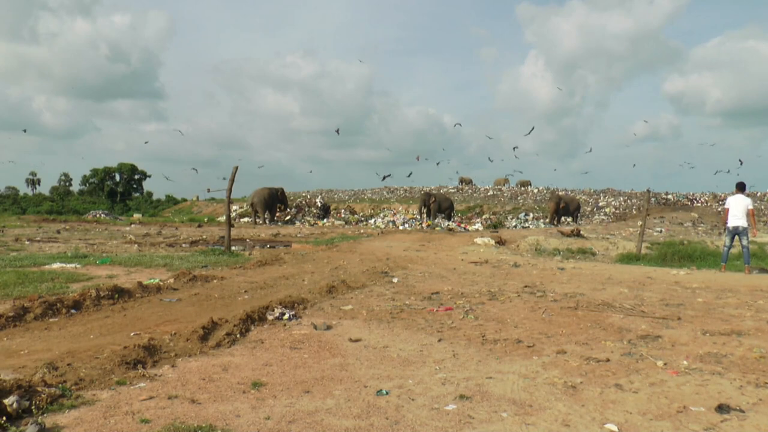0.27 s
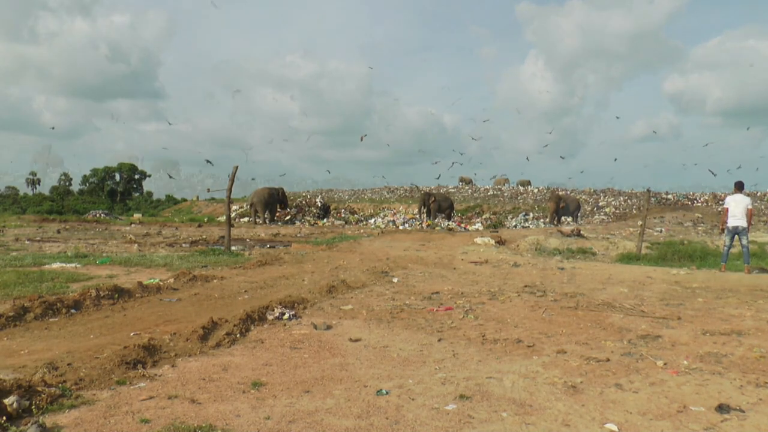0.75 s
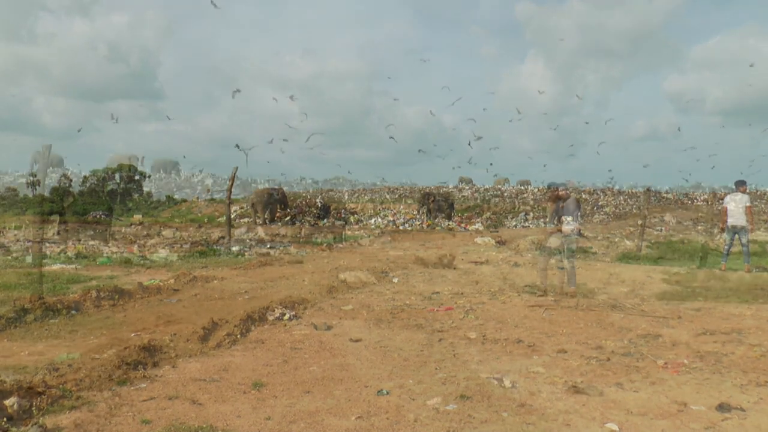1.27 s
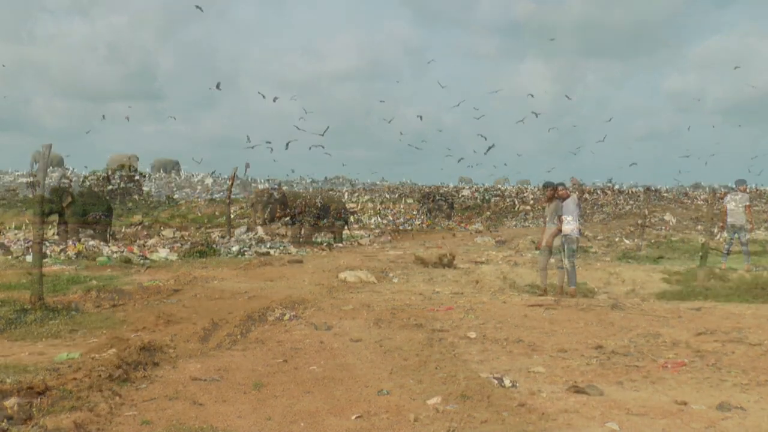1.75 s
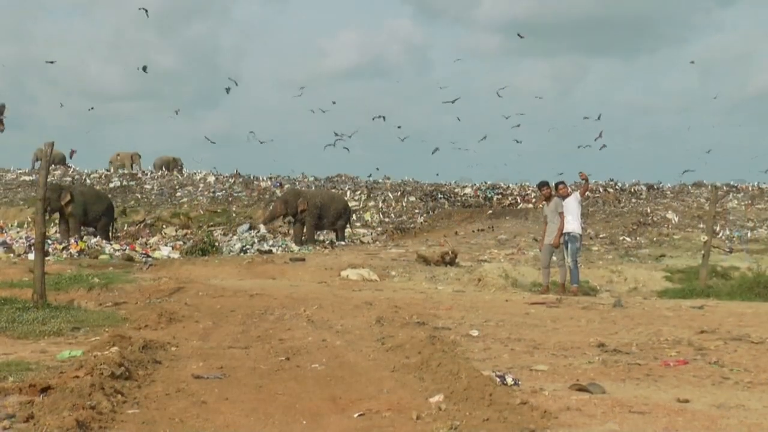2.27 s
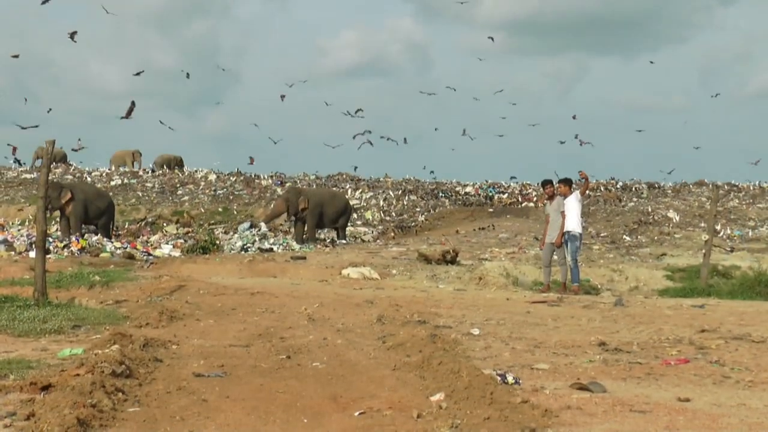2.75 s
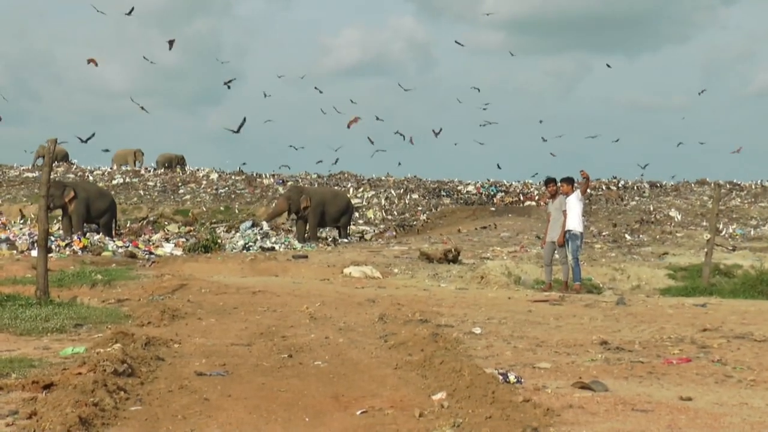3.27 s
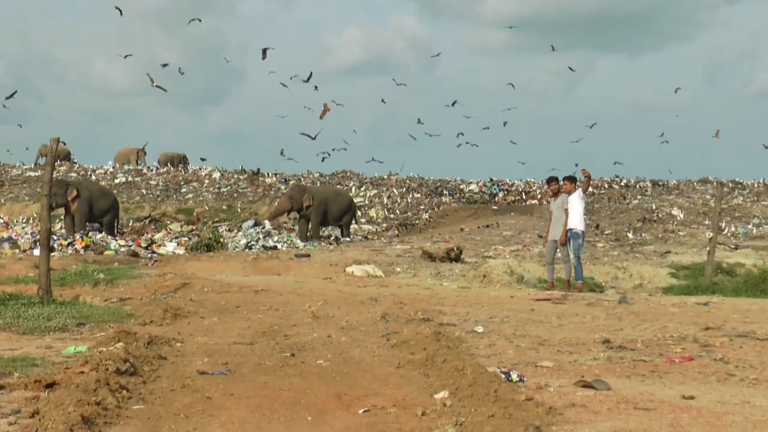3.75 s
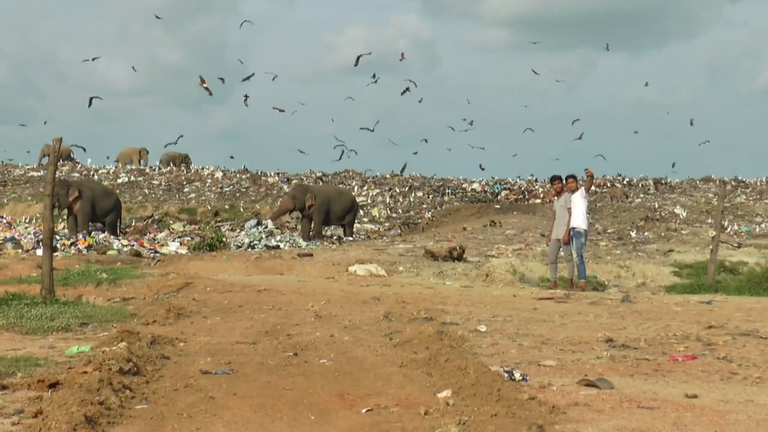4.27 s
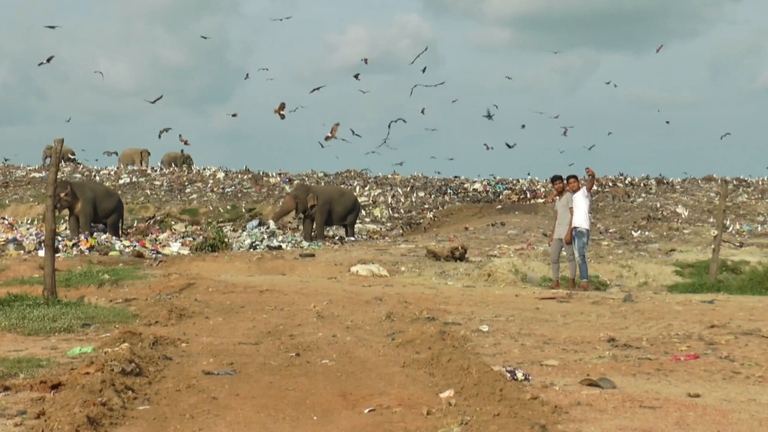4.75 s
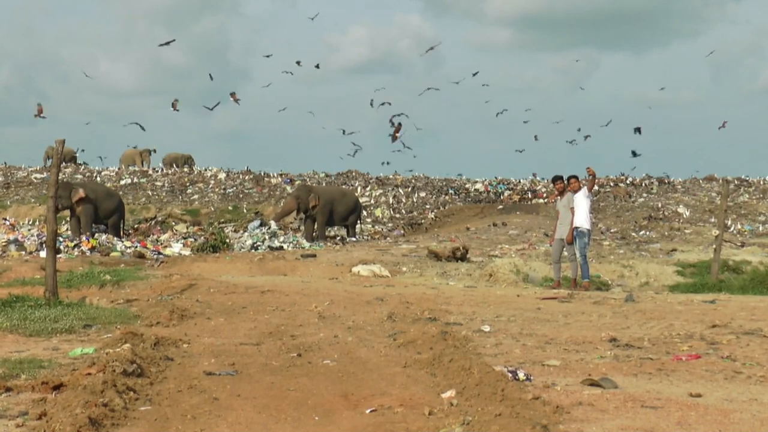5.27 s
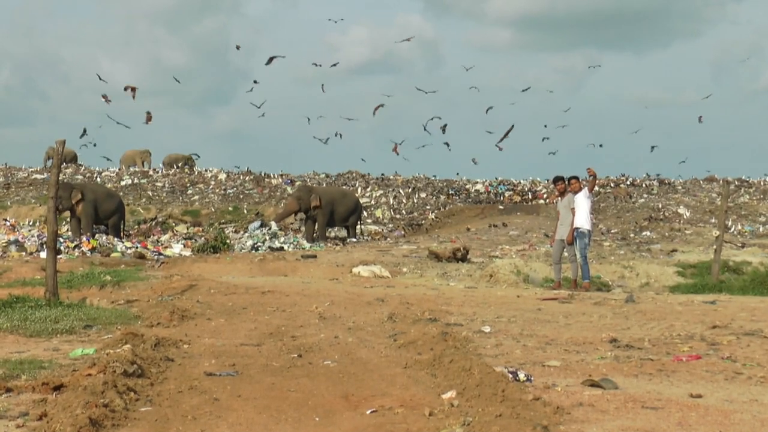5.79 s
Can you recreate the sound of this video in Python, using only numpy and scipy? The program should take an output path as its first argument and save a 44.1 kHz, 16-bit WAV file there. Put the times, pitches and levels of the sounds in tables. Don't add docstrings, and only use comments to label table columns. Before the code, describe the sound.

Hoarse near crows call above a continuous din of distant cawing outdoors, with tiny bird chirps, a repeated piping note and soft wind rumble.

```python
import sys
import numpy as np
from scipy import signal
from scipy.fft import rfft, irfft, next_fast_len
from scipy.io import wavfile
from scipy.ndimage import uniform_filter1d, map_coordinates

SR = 44100
rng = np.random.default_rng(int(sys.argv[2]) if len(sys.argv) > 2 else 0)


def file_out(sig):
    cols = np.atleast_2d(sig).T
    lim = np.clip(cols, -1, 1)
    pcm = np.round(lim * 32767).astype(np.int16)
    wavfile.write(sys.argv[1], SR, pcm)


def gain_from_decibels(decibels):
    exponent = np.asarray(decibels, float) / 20
    return 10 ** exponent


N = 265482
HOOK_S, HOOK = .075, .13


def unit(x):
    return x / np.sqrt(np.mean(x ** 2) + 1e-20)


def along(points, hz):
    f, v = np.transpose(points)
    return np.interp(np.log(hz + 1), np.log(f + 1), v)


def at_times(points, t):
    s, v = np.transpose(points)
    return np.interp(t, s, v)


def wobble(n, rate):
    knots = rng.standard_normal(int(n * rate / SR) + 4)
    return map_coordinates(knots, [np.arange(n) * rate / SR], order=1)


def filtered(x, response):
    m = next_fast_len(N + 8192)
    return irfft(rfft(x, m) * response(np.fft.rfftfreq(m, 1 / SR)), m)[..., :N]


def turns(hz):
    return 2 * np.pi * np.cumsum(hz) / SR


def fade(n, rise_s, fall_s):
    t = np.arange(n) / SR
    return np.sin(np.pi / 2 * np.clip(np.minimum(t / rise_s, t[::-1] / fall_s), 0, 1)) ** 2


def add(out, s, x, pan_db):
    at = round(s * SR)
    part = out[:, max(at, 0):max(at + x.shape[-1], 0)]
    sides = gain_from_decibels([[pan_db / 2], [-pan_db / 2]])
    part += sides * x[..., max(-at, 0):][..., :part.shape[1]]


def contour(length, top_hz, end_hz, power):
    t = np.arange(round(length * SR)) / SR
    scoop = HOOK * np.clip(1 - t / HOOK_S, 0, 1) ** 3
    after = np.clip((t - HOOK_S) / (length - HOOK_S), 0, 1)
    return t, top_hz * (1 - scoop) - (top_hz - end_hz) * after ** power


def syrinx(pitch, rasp_hz, depth, shake):
    n = len(pitch)
    rasp_rate = rasp_hz * pitch / pitch.max() * (1 + .02 * wobble(n, 40))
    rasp = turns(rasp_rate) + rng.uniform(0, 2 * np.pi)
    phase = turns(pitch * (1 + .0045 * wobble(n, 120))) + shake * np.sin(rasp)
    swell = (1 + np.clip(depth, 0, 1) * np.cos(rasp)) * gain_from_decibels(2.2 * wobble(n, 45))
    return phase, swell


def field(x, t60):
    t = np.arange(SR // 3) / SR
    tail = rng.standard_normal((2, len(t))) * gain_from_decibels(-60 * t / t60) * (t > .004)
    return signal.fftconvolve(x, tail / np.linalg.norm(tail[0]), axes=1)[:, :N]


# [t/s, length/s, top f/Hz, end f/Hz, level/dB]
NEAR_CAWS = [
    [(1.712, 0.35, 632, 511.7, -44), (1.79, 0.25, 645.5, 577, -51.5), (5.0, 0.34, 591, 490, -43)],
    [(4.728, 0.32, 664.6, 571, -47), (5.2, 0.23, 631, 560, -53.5)],
    [(-.04, 0.34, 689, 579, -59.5), (.08, 0.19, 630, 564, -58), (.59, 0.18, 724, 694, -67)],
    [(-.2, 0.33, 618, 488, -49.5), (.938, 0.46, 619.2, 472, -46.5)],
    [(.745, 0.22, 648, 628, -56.5), (2.1, 0.15, 596, 560, -51.5), (2.16, .26, 596, 475, -52),
     (2.395, 0.3, 651, 575, -61), (4.0, 0.27, 643, 493, -58), (5.7, 0.38, 634, 522, -60)],
    [(0.984, 0.52, 688, 508, -63.5)],
    [(2.881, 0.3, 679.4, 584, -62)],
    [(4.565, 0.3, 688, 535, -67)],
    [(4.12, 0.4, 657.6, 515.5, -58.5)],
    [(3.576, 0.37, 690, 560, -54.5), (3.6, .3, 622, 555, -58)],
]
# [rasp f/Hz, rasp depth 0-1, pitch shake/rad, level drift/dB per s, droop power]
BIRD_MANNER = [(99.1, 0.28, -0.055, -31, 1.35), (93.8, 0.6, 0.17, -9, 0.84), (98, 0.5, -0.57, 12, 1.3),
               (103, 0.4, -0.2, -6.5, 1.15), (97.2, 0.55, 0.05, 1, 1.2), (97.2, 0.4, -0.42, -39, 1.5),
               (98.2, 0.14, -0.47, -11, 1.4), (91.4, 0.6, -0.0034, -17, 0.97), (94.8, 0.2, 0.22, -10, 1.15),
               (98.2, 0.65, -0.35, 14, 1.4)]
# [1st harmonic re 3rd/dB, 2nd re 3rd/dB, overtones/dB, left-right/dB]
BIRD_COLOUR = [(-21, -9.5, -11.5, -4.5), (-19.5, -13.5, -4, -5.5), (-26, -7, -4.5, -3.5),
               (-22.5, -17.5, -8.5, -4), (-29, -15, -19, 0.5), (-9, 12, 2, -2), (-8.5, 0.5, 10.5, -5.5),
               (-14, 12.5, 8, -1), (-18, -12, -6, -8.5), (-21, -8.5, -4, -5.5)]
BIRD_BREATH = [-35, -33, -29, -27, -34.5, -17, -24, -21, -29, -27]
# [f/Hz, level/dB]
BEAK = [(2000, -6.5), (2600, -11), (3300, -28), (4100, -55), (5000, -13), (6500, 5), (8000, -22)]
# [f/Hz, level/dB]
THROAT_TUBE = [(1000, 0), (1300, 0), (1520, -5), (1820, 1), (2050, 0), (2400, -2), (3000, 0)]
# [f/Hz, level/dB]
BEAK_HISS = [(1000, -33), (2500, 3), (4000, 2), (5000, -3.5), (6500, -0.5), (8000, -8), (10500, -12),
             (14000, -25)]


def near_crows():
    out, breath = np.zeros((2, 2, N))
    for calls, manner, colour, hiss_db in zip(NEAR_CAWS, BIRD_MANNER, BIRD_COLOUR, BIRD_BREATH):
        *rasp, drift_db, power = manner
        first_db, second_db, over_db, pan_db = colour
        for s, length, top_hz, end_hz, db in calls:
            t, pitch = contour(length, top_hz, end_hz, power)
            n = len(t)
            phase, swell = syrinx(pitch, *rasp)
            level = [first_db, second_db, 0]
            level += [over_db + along(BEAK, k * pitch) for k in range(4, 7)]
            voice = sum(gain_from_decibels(v) * np.sin(k * phase + k * k) * swell ** min(k / 3, 1)
                        for k, v in enumerate(level, 1))
            push = gain_from_decibels(db + 3.5 + drift_db * (t - HOOK_S)) * fade(n, .052, .025)
            add(out, s, voice * push, pan_db)
            air = gain_from_decibels(hiss_db + 11) * push * swell * fade(n, .08, .05)
            add(breath, s, air * rng.standard_normal((2, n)), pan_db)
    voices = filtered(out, lambda hz: gain_from_decibels(along(THROAT_TUBE, hz)))
    return voices + filtered(breath, lambda hz: gain_from_decibels(along(BEAK_HISS, hz)))


# [t/s, length/s,
# start f/Hz, end f/Hz, level/dB]
BARK_CALLS = [(0.192, 0.08, 1290, 1660, -52.5), (0.439, 0.1, 1320, 1190, -56),
              (0.694, 0.091, 1285, 1815, -53), (0.834, 0.09, 1290, 1800, -55),
              (1.402, 0.03, 1400, 1760, -57), (1.39, 0.07, 1260, 1760, -55), (1.613, 0.087, 880, 379, -74),
              (4.516, 0.06, 1215, 1340, -53), (3.147, .045, 1796, 1370, -59), (3.51, 0.074, 940, 655, -68),
              (3.07, .11, 1600, 1540, -61), (.63, .1, 1130, 1090, -61), (3.505, 0.08, 1960, 1300, -57)]


def barks():
    out = np.zeros((2, N))
    for s, length, hz, end_hz, db in BARK_CALLS:
        u = np.linspace(0, 1, round(length * SR))
        bend = 5 if end_hz > hz else 2
        phase, swell = syrinx(hz + (end_hz - hz) * u ** bend, 99, depth=.55, shake=.39)
        push = gain_from_decibels(db + 2 + 2.5 * u ** 5) * fade(len(u), .019, .0049)
        add(out, s, push * swell * np.sin(phase), 0)
    return out


# [t/s, length/s, top f/Hz, end f/Hz, level/dB]
WHINE_CALLS = [
    (3.625, .28, 1345, 1185, -57.5),
    (2.89, .27, 2160, 1830, -63),
    (1.89, .12, 1400, 1100, -60),
]


def whines():
    rise, top_at = .1185, .325
    out = np.zeros((2, N))
    for s, length, top_hz, end_hz, db in WHINE_CALLS:
        u = np.linspace(0, 1, round(length * SR))
        corners = np.interp(u, [0, top_at, 1], [top_hz * (1 - rise), top_hz, end_hz])
        pitch = uniform_filter1d(corners, size=len(u) // 6, mode="nearest")
        phase, swell = syrinx(pitch, 94.5, depth=.33, shake=-.21)
        add(out, s, gain_from_decibels(db + 5.5) * swell * np.sin(phase) * fade(len(u), .02, .035), -3)
    return out


# [t/s, length/s, top pulse f/Hz, level/dB, brightness above the 3rd resonance/dB]
CROAK_CALLS = [
    (0.477, 0.12, 105, -55.5, -3.5),
    (0.945, .31, 96.7, -49.5, -6.5),
    (1.871, 0.23, 101.8, -50.5, -10),
    (2.887, 0.39, 103, -63.5, 6),
    (3.292, .24, 100.7, -49.5, 3.5),
    (5.001, 0.4, 99.9, -52.5, 2),
]
# [multiple of pulse rate, width in multiples, level/dB]
GULLET_LINES = [(11.8, .8, -5), (16.3, .75, 3.5), (20.3, .75, -2), (23.6, 1.1, -14), (41.5, 2, -26)]


def croaks():
    sag_per_s, fade_db_per_s = .45, -2
    drop, drop_s, drop_db = .12, .015, 3
    pan_db, air_db = -6, -12
    out, breath = np.zeros((2, 2, N))
    order = np.arange(7, 50)
    lag = np.arctan2(1, np.subtract.outer(order, [c for c, w, db in GULLET_LINES])).sum(1)
    lag = lag + .12 * order ** 2
    for s, length, top_hz, top_db, bright_db in CROAK_CALLS:
        t, rate = contour(length, top_hz, top_hz * (1 - sag_per_s * (length - HOOK_S)), power=1.3)
        n = len(t)
        spent = np.exp((t - length) / (2 * drop_s))
        rate = rate * (1 - drop * np.clip((bright_db + 8) / 8, .15, 1) * spent ** 2)
        phase = turns(rate * (1 + .008 * wobble(n, 90)))
        gain = sum(gain_from_decibels(db + bright_db * (k > 2)) / (1 + ((order - c) / w) ** 2) ** 1.4
                   for k, (c, w, db) in enumerate(GULLET_LINES))
        voice = gain @ np.sin(np.outer(order, phase) + lag[:, None])
        push = gain_from_decibels(top_db + fade_db_per_s * t - drop_db * spent + 1.8 * wobble(n, 94))
        push = push * fade(n, .025, .01)
        add(out, s, push * voice, pan_db)
        air = gain_from_decibels(bright_db + air_db) * push * (1 + .4 * np.cos(phase))
        add(breath, s, air * rng.standard_normal((2, n)), pan_db)
    return out + filtered(breath, lambda hz: gain_from_decibels(along(BEAK_HISS, hz)))


# [t/s, level/dB]
FLOCK_LEVEL = [(0, -54.5), (.35, -57), (.79, -58), (1.1, -52), (1.52, -56.5), (1.85, -53), (2.4, -54.5),
               (2.72, -59), (2.95, -56.5), (3.2, -54), (3.45, -57.5), (3.95, -54.5), (4.45, -54),
               (4.61, -59), (5, -51), (5.44, -52.5), (5.55, -58.5), (6.02, -53)]
# [f/Hz, level/dB]
FLOCK_THROAT = [(240, -11), (400, -23), (555, -16.5), (678, -19), (912, -12), (1090, -11), (1190, -5.5),
                (1440, 2), (1770, 0.5), (2150, -5), (2620, -20), (3450, -15), (5000, -18), (6500, -63),
                (11000, -120)]


def flock(count=150):
    echo_db, echo_t60_s = -8, .35
    out = np.zeros((2, N))
    for k, (when, long, high, hoarse, loud, side) in enumerate(rng.random((count, 6))):
        u = np.linspace(0, 1, round((.15 + .25 * long) * SR))
        pitch = (500 + 200 * high) * (1 - .1207 * np.exp(-u / .05967) - .2 * u ** 1.6)
        phase, swell = syrinx(pitch, 85 + 30 * side, .84 + .73 * hoarse, .39 * (side - .5))
        voice = sum(np.sin(h * phase + h * h) for h in range(1, 7)) * swell
        s = (k + when) / count * (N / SR + .2) - .2
        add(out, s, gain_from_decibels(7.5 * loud) * voice * fade(len(u), .028, .018), 5 * (side - .5))
    out = filtered(out, lambda hz: gain_from_decibels(along(FLOCK_THROAT, hz)))
    out += gain_from_decibels(echo_db) * field(out, echo_t60_s)
    power = uniform_filter1d(np.mean(out ** 2, 0), size=SR // 5)
    crowd = np.sqrt(np.abs(power) + 1e-12)
    return out / crowd * gain_from_decibels(at_times(FLOCK_LEVEL, np.arange(N) / SR))


# [t/s, length/s, foot f/Hz, turning f/Hz,
# level/dB]
ARCHED = [(0.337, 0.13, 2640, 4600, -73.5), (0.868, .035, 3350, 3800, -74), (3.8, .055, 2850, 3650, -71),
          (3.362, .025, 3450, 2800, -69), (2.045, .05, 3050, 3350, -72), (1.449, 0.018, 2300, 3050, -65),
          (1.826, .042, 2760, 4030, -69.5), (2.454, 0.076, 2680, 4570, -65),
          (3.077, 0.022, 5300, 5150, -71), (3.988, 0.036, 3400, 4650, -68),
          (4.025, 0.025, 2920, 4200, -60.5), (4.048, .013, 2720, 3500, -62), (4.061, .011, 3100, 4000, -69),
          (4.519, 0.071, 2960, 4320, -65.5), (5.783, 0.078, 3010, 3970, -76.5)]
# [t/s, length/s, start f/Hz, end f/Hz, level/dB]
SLIDING = [(0.079, 0.072, 3670, 3560, -75.5), (.375, .015, 3800, 4930, -71),
           (0.647, 0.032, 3560, 2750, -71), (0.9, 0.045, 3700, 4300, -75), (.834, .035, 3550, 4400, -75),
           (1.252, 0.02, 3870, 2560, -70), (1.287, 0.04, 2570, 2290, -70), (1.396, .013, 3720, 3250, -65),
           (1.405, .022, 4030, 3250, -73), (1.387, .02, 2880, 2300, -71), (1.76, 0.036, 5400, 3450, -70.5),
           (1.905, 0.115, 3180, 3700, -71.5), (1.79, .02, 3250, 3100, -70), (1.802, .01, 3500, 3900, -71),
           (2.4, 0.039, 3630, 4700, -79), (3.103, 0.02, 5440, 4080, -65.5), (3.191, .03, 4280, 3430, -73),
           (3.726, .031, 3700, 2380, -67.5), (3.57, .045, 3750, 3050, -73), (4.012, .008, 3800, 4600, -70),
           (4.068, 0.27, 7030, 7500, -75), (4.18, 0.14, 3730, 3570, -75.5), (4.3, 0.37, 3200, 3030, -78),
           (4.455, 0.047, 3690, 3830, -69), (4.591, 0.011, 5500, 5300, -63),
           (5.03, 0.087, 3160, 3050, -68.5),
           (0.958, .018, 2640, 4300, -67), (0.972, 0.054, 4200, 3720, -66.5),
              (1.22, .07, 7900, 6650, -79), (2.888, 0.027, 2330, 2550, -65),
              (1.417, 0.026, 2300, 2800, -71), (1.75, .022, 3090, 4000, -73), (1.896, .07, 3500, 3880, -81),
              (2.02, 0.06, 3650, 3900, -77), (5.5, .025, 3150, 3550, -73), (5.0, .04, 3650, 3200, -71),
              (2.602, .06, 3190, 2600, -87), (3.217, 0.035, 3200, 3620, -74),
              (3.976, .017, 4400, 5200, -69), (3.968, .018, 3550, 4250, -74),
              (3.65, 0.034, 2990, 3800, -71), (3.868, .04, 3050, 3520, -73)]


def whistles():
    out = np.zeros((2, N))
    bends = [(s, d, [a, b, a], db) for s, d, a, b, db in ARCHED]
    bends += [(s, d, [a, a + .4 * (b - a), b], db) for s, d, a, b, db in SLIDING]
    for s, length, hz, db in bends:
        u = np.linspace(0, 1, round(length * SR))
        n = len(u)
        pitch = uniform_filter1d(np.interp(u, [0, .38, 1], hz), size=n // 2, mode="nearest")
        pitch = pitch * (1 + .008 * wobble(n, 160))
        push = gain_from_decibels(db + 8 + 2.2 * wobble(n, 90)) * fade(n, .002, .008)
        add(out, s, push * np.sin(turns(pitch)), -1.5)
    return out


# t/s, length/s, centre f/Hz, swing f/Hz, level/dB
TRILL = (1.286, .108, 3680, 480, -65.5)


def trill():
    swing_s, growth_db = .0305, 3
    out = np.zeros((2, N))
    s, length, hz, swing_hz, db = TRILL
    t = np.arange(round(length * SR)) / SR
    n = len(t)
    swing = np.cos(2 * np.pi * t / swing_s - .3 + .1 * wobble(n, 40))
    level = db + 10 + growth_db * t / length + 5 * (swing - 1) + 1.2 * wobble(n, 60)
    add(out, s, gain_from_decibels(level) * np.sin(turns(hz - swing_hz * swing)) * fade(n, .003, .006), -1.5)
    return out


# [t/s, f/Hz, level/dB]
PIPE_NOTES = [
    (4.087, 2870, -61.5),
    (4.273, 2830, -60.5),
    (4.443, 2855, -60),
    (4.61, 2830, -59.5),
    (4.8, 2800, -58),
    (4.985, 2764, -54.5),
    (5.2, 2646, -56),
    (5.413, 2690, -63),
    (5.61, 2670, -68),
]


def pipes():
    out = np.zeros((2, N))
    u = np.linspace(0, 1, round(.077 * SR))
    n = len(u)
    for s, hz, db in PIPE_NOTES:
        push = gain_from_decibels(db + 1.5 + 1.5 * wobble(n, 80)) * fade(n, .0075, .0045)
        add(out, s, push * np.sin(turns(hz * (1 - .07 * u ** 14))), -2.5)
    return out


# [t/s, length/s, f/Hz, width f/Hz, level/dB]
RATTLE_CALLS = [(.29, 0.079, 3360, 400, -74), (.43, .048, 3700, 370, -73), (0.864, .16, 7150, 400, -77.5),
                (1.023, .15, 5970, 1000, -68.5), (1.041, .14, 4280, 450, -71),
                (1.198, .042, 3560, 350, -64), (1.32, 0.12, 7450, 1500, -72), (3.315, .23, 4070, 420, -68),
                (4.45, .14, 7000, 2698, -74.5), (5.595, 0.02, 3300, 500, -66),
                (5.595, .012, 2600, 500, -66), (1.72, .06, 3380, 250, -72), (5.01, .2, 4120, 300, -74),
                (3.32, .2, 6700, 1300, -74), (3.25, .08, 3150, 200, -73), (5.37, .05, 3320, 150, -72),
                (5.675, .026, 8600, 630, -74)]


def rattles():
    out = np.zeros((2, N))
    for s, length, hz, width_hz, db in RATTLE_CALLS:
        n = round(length * SR)
        buzz = np.array([wobble(n, width_hz), wobble(n, width_hz)])
        tone = np.sin(turns(np.full(n, hz)))
        add(out, s, gain_from_decibels(db + 7.5) * buzz * tone * fade(n, .0057, .0056), -2)
    return out


# [t/s, peak level/dB, thud level/dB]
KNOCKS = [
    (5.3759, -51, -6),
    (5.4516, -55.5, -8),
    (5.598, -60, -22),
    (5.6064, -76, -15),
    (5.664, -80, 17),
]


def ticks():
    out, t = np.zeros((2, N)), np.arange(SR // 25) / SR
    for s, db, thud_db in KNOCKS:
        crack = rng.standard_normal((2, len(t))) * gain_from_decibels(-60 * t / .014)
        thud = gain_from_decibels(thud_db - 3 - 60 * t / .05) * np.sin(2 * np.pi * 260 * t)
        add(out, s, gain_from_decibels(db + 6) * (crack + thud), -1.5)
    return filtered(out, lambda hz: 1 / (1 + (hz / 8000) ** 4))


# [peak t/s, half length/s, level/dB, left-right/dB]
PORT_GUSTS = [(0, 0.095, -53.5, 4), (0.18, 0.087, -56.5, 0), (0.404, 0.11, -68, 17),
              (0.52, 0.17, -61.5, 3.5), (0.902, 0.14, -58.5, 4), (1.052, 0.14, -60, 4),
              (1.22, 0.091, -59.5, 1), (1.362, 0.11, -67.5, 8), (1.645, 0.32, -85.5, 23),
              (4.51, 0.055, -63.5, 0), (3.2, 0.095, -92, 10), (5.204, 0.087, -77, 10),
              (5.74, 0.025, -71, 10), (5.962, 0.058, -78, 9)]
# [f/Hz, level/dB]
BUFFET_TONE = [(18, -50), (30, -11), (43, -24), (86, 1.5), (135, -1), (162, -1.5), (301, -8.5), (459, -20),
               (574, -21.5), (700, -27.5), (910, -21), (1540, -120)]
# [f/Hz, level/dB]
AIR_TONE = [(18, -67), (30, -35), (177, -9), (440, -5.5), (513, -24), (731, -3.5), (1280, -12.5),
            (1730, -32), (2170, -4.5), (2730, -8), (9210, -18), (10200, -16), (12800, -27), (16700, -61),
            (22000, -120)]
# [t/s, level/dB]
AIR_LEVEL = [
    (0, -66.5),
    (5.3, -65.5),
    (5.6, -70.5),
    (6.02, -66.5),
]


def wind():
    t = np.arange(N) / SR
    force = gain_from_decibels(-77.5)
    for s, half, db, pan_db in PORT_GUSTS:
        force = force + gain_from_decibels(db + pan_db * np.array([[.5], [-.5]])) * np.exp(-((t - s) / half) ** 2)
    lumps = gain_from_decibels(3.36 * np.array([wobble(N, 25), wobble(N, 25)]))
    noise = rng.standard_normal((2, N))
    rumble = unit(lumps * filtered(noise, lambda hz: gain_from_decibels(along(BUFFET_TONE, hz))))
    breeze = unit(filtered(rng.standard_normal((2, N)), lambda hz: gain_from_decibels(along(AIR_TONE, hz))))
    return gain_from_decibels(3.5) * force * rumble + gain_from_decibels(at_times(AIR_LEVEL, t) + .46 * wobble(N, 6.7)) * breeze


def hum():
    swell = np.clip(np.arange(N) / SR - 1.05, 0, 1)
    return gain_from_decibels(-73.5) * swell * np.sin(turns(np.full(N, 50)) + [[0], [1.6]])


def scene():
    lead_s, echo_db, echo_t60_s = 6e-5, -14, .2
    far = flock()
    near = near_crows() + barks() + whines() + whistles() + trill() + pipes()
    near = near + croaks() + rattles() + ticks()
    birds = near + gain_from_decibels(echo_db) * field(near, echo_t60_s) + far
    sides = np.array([[1], [-1]])
    birds = filtered(birds, lambda hz: np.exp(1j * np.pi * hz * lead_s * sides))
    return birds + wind() + hum()


def band_limit(x):
    return signal.sosfilt(signal.butter(12, 13070, fs=SR, output="sos"), x)


def record(dry):
    from_s, to_s = 5.696, 5.7335
    t = np.arange(N) / SR
    gap = np.clip(np.maximum(from_s - t, t - to_s) / .001, 0, 1)
    return band_limit(dry * gap)


dry = scene()
out = record(dry)
file_out(out)
```